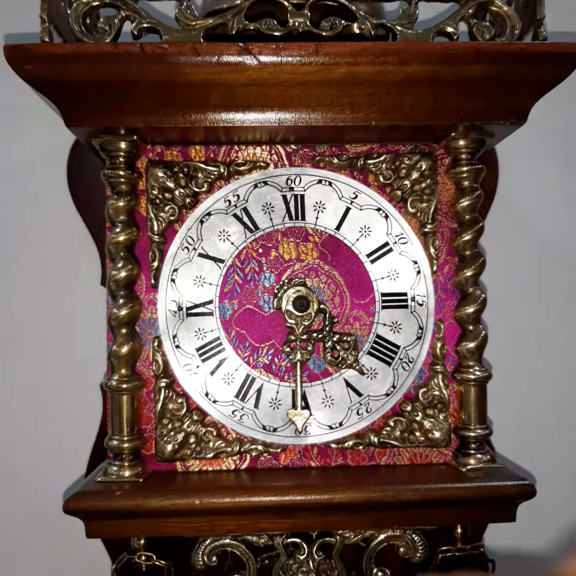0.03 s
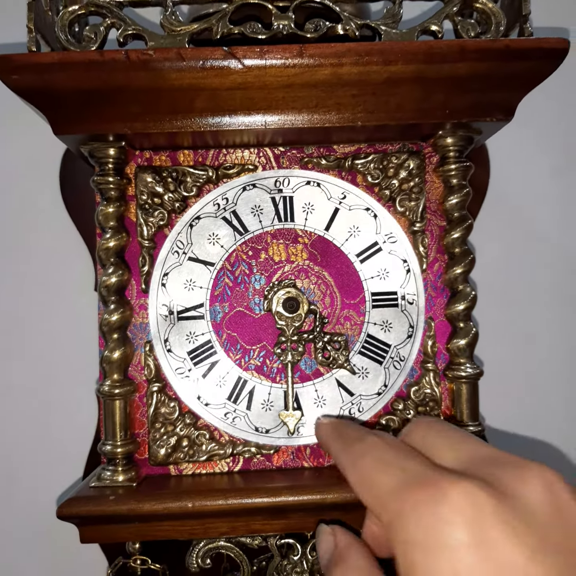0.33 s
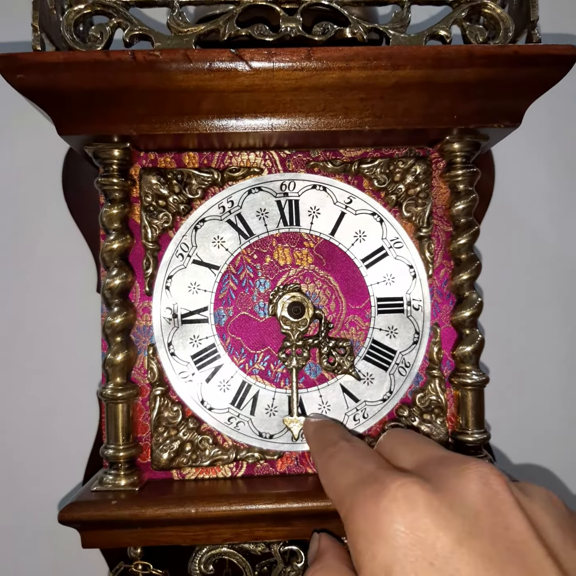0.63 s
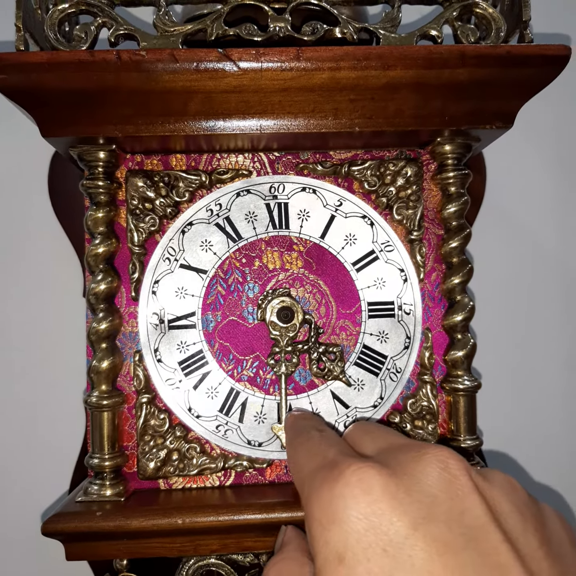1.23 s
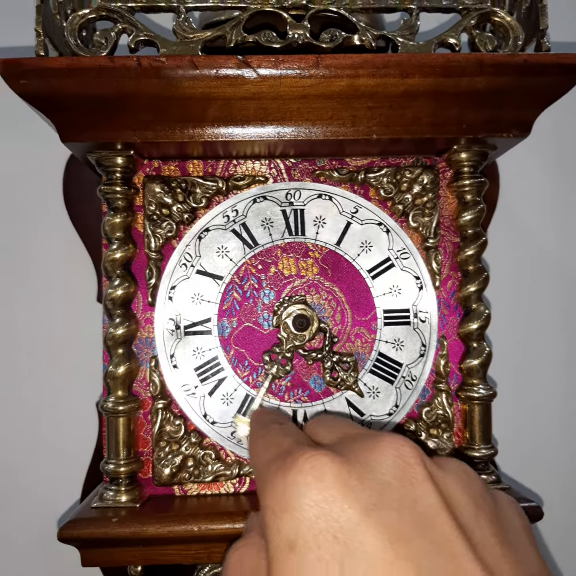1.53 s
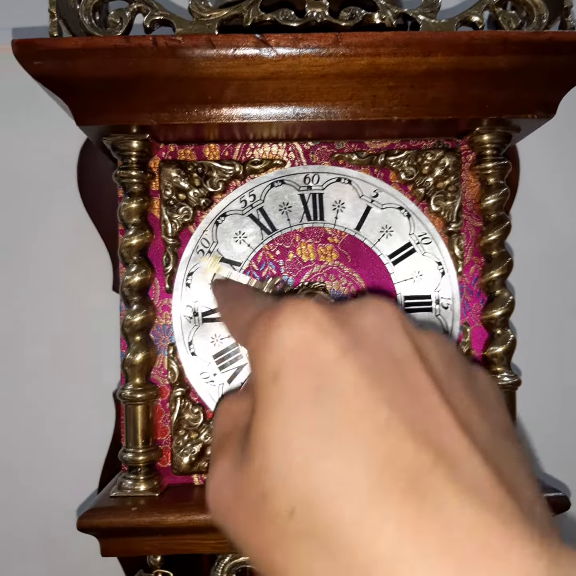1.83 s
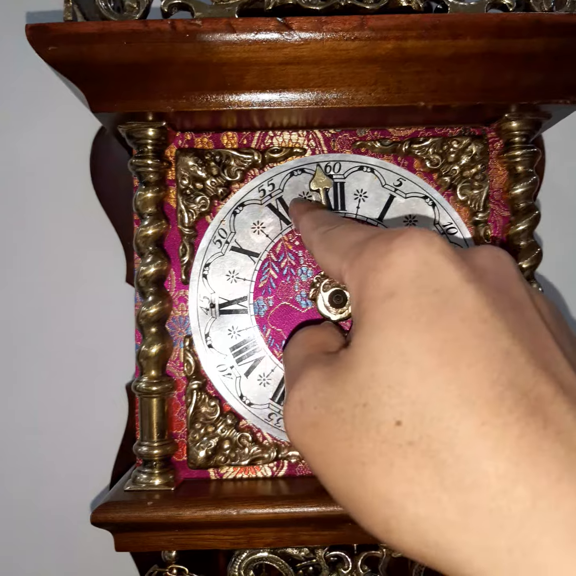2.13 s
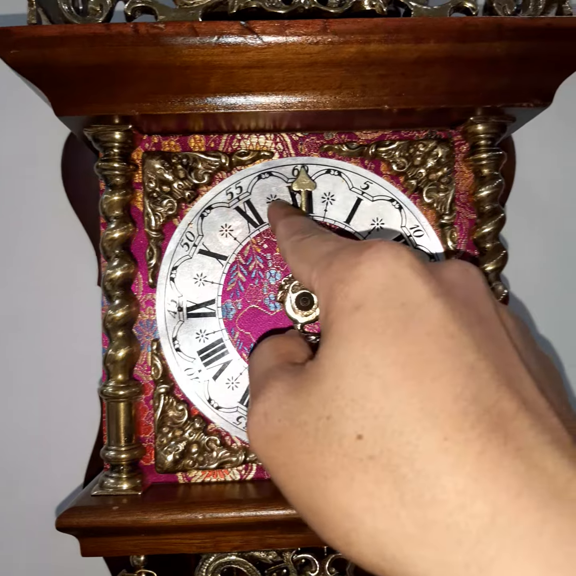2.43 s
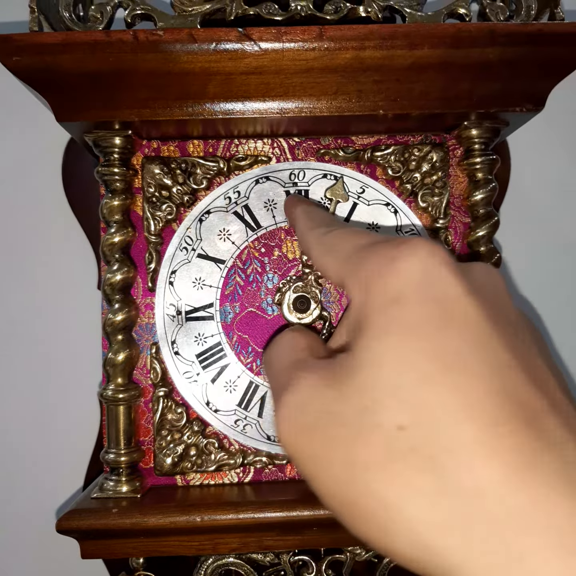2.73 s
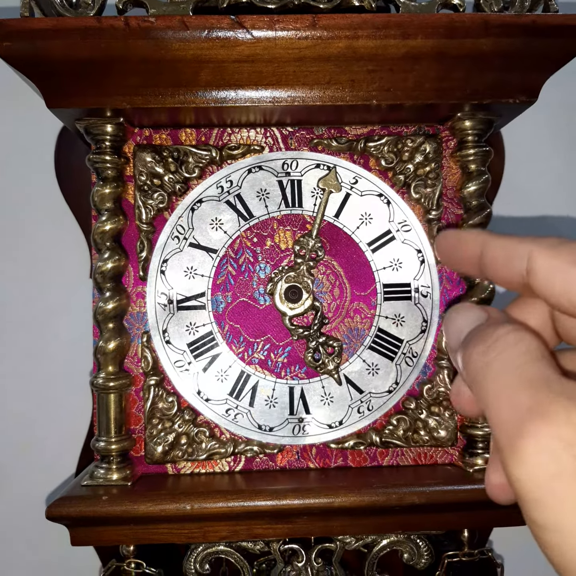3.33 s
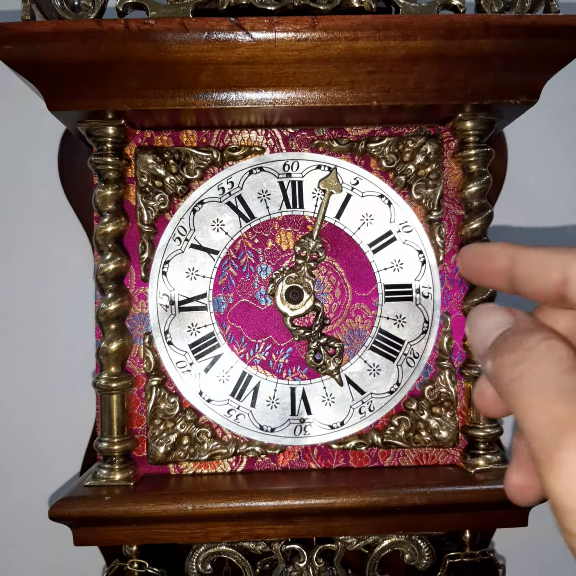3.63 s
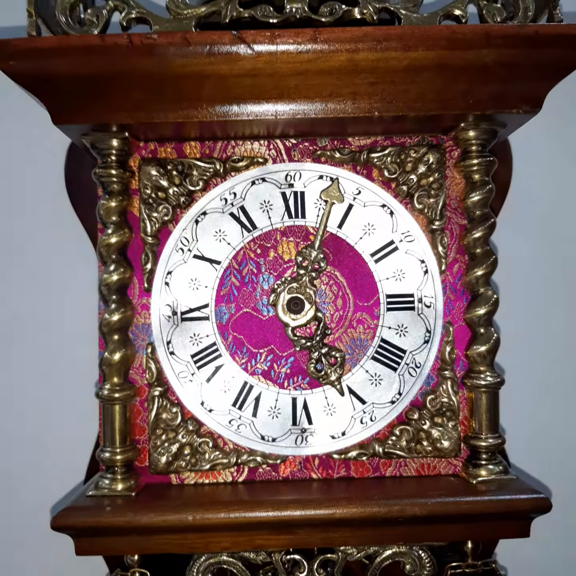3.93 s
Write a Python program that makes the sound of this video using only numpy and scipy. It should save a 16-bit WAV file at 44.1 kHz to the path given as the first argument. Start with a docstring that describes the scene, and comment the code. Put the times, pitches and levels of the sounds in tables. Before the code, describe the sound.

A wall clock's bell is already ringing from a strike. Levers knock and click in the wooden case as a finger turns the minute hand, then the bell strikes again and rings on, close up in a quiet room.

```python
"""A quiet room, a phone microphone close to a wall clock that is being set by hand.
At first the bell still rings from the half hour. A finger rubs the minute hand round the dial, the
strike levers knock in the wooden case, and the escapement ticks faintly in between. Near 3 s a low hum
swells and fades. At 3.4 s, on the hour, the hammer clashes on the bell again; it rings on over the
last few knocks."""
import sys
import numpy as np
from scipy import signal
from scipy.fft import rfft, irfft
from scipy.io import wavfile

SR = 44100
rng = np.random.default_rng(int(sys.argv[2]) if len(sys.argv) > 2 else 0)


def generate_wav(signal):
    """Clip the signal to [-1, 1] and save it as 16-bit WAV at the path in sys.argv[1]."""
    frames = np.transpose(np.atleast_2d(signal))
    scaled = np.clip(frames, -1, 1) * 32767
    pcm = np.round(scaled).astype(np.int16)
    wavfile.write(sys.argv[1], SR, pcm)


N = 176400
T = np.arange(N) / SR
FREQS = np.arange(N // 2 + 1) * SR / N
SIDE = np.array([[1], [-1]])  # opposite sign left and right: stereo width


def undb(db):
    """Decibels to gain."""
    return 10 ** (np.asarray(db) / 20)


def unit(x):
    """Scale to rms 1."""
    return x / np.sqrt(np.mean(x ** 2))


def pan(db):
    """Stereo gains that put the left side db above the right."""
    return undb(SIDE * db / 2)


def curve(points):
    """Gain over time from (time [s], level [dB]) points."""
    return undb(np.interp(T, *np.array(points).T))


def white():
    """Spectrum of fresh white noise."""
    return rfft(rng.standard_normal(N))


def walk(rate_hz):
    """Smooth random drift with spread 1."""
    return unit(irfft(white() * np.exp(-(FREQS / rate_hz) ** 2) * (FREQS > 0), N))


def tint(spectrum, colour):
    """Signal of rms 1 from a spectrum shaped by (frequency [Hz], level [dB]) points."""
    hz, db = np.array(colour).T
    return unit(irfft(spectrum * undb(np.interp(np.log(FREQS + 1), np.log(hz), db)), N))


def noise(colour):
    """Coloured noise of rms 1."""
    return tint(white(), colour)


def resonant(peaks):
    """Noise of rms 1 in steep resonances."""
    gain = sum(undb(db) / (1 + ((FREQS - hz) / width) ** 2) for hz, width, db in peaks)
    return unit(irfft(white() * gain, N))


def decay(start, t60, rise=0.00053):
    """Fast attack, then a fall of 60 dB in t60 seconds."""
    age = np.maximum(T - start, 0)
    return (1 - np.exp(-age / rise)) * np.exp(-np.log(1000) * age / t60)


def note(start, hz, db, t60):
    """One struck mode: a dying sine."""
    return undb(db) * decay(start, t60) * np.sin(2 * np.pi * hz * (T - start))


def blows(times, levels, t60):
    """Envelope of short blows, each with the room's tail 19 dB below it."""
    return sum(undb(db) * (decay(at, t60) + undb(-19) * decay(at, t60=0.45, rise=0.0037))
               for at, db in zip(times, levels))


# Room tone on each side of the microphone (frequency [Hz], relative level [dB])
ROOM_COLOUR_LEFT = [(25, -26), (60, -16), (100, 2.5), (150, -7.5), (230, -3.5), (400, -13), (800, -2),
                    (1300, -9.5), (2000, -13.5), (3200, -22.5), (5000, -33), (9000, -34.5), (16000, -41.5)]
ROOM_COLOUR_RIGHT = [(25, -32), (60, -8), (100, 1.5), (150, -8), (230, -12.5), (400, -18), (800, -17),
                     (1300, -22), (1900, -27), (2350, -20), (3100, -40), (3800, -60), (8000, -53.5),
                     (16000, -57)]

def room_tone():
    """Low noise of the room, its bass largely shared by both sides."""
    shared = white()
    share = 0.74 / (1 + (FREQS / 900) ** 2)
    sides = []
    for colour, db in ((ROOM_COLOUR_LEFT, -58), (ROOM_COLOUR_RIGHT, -50)):
        spectrum = np.sqrt(share) * shared + np.sqrt(1 - share) * white()
        sides.append(undb(db) * tint(spectrum, colour))
    return np.array(sides)


# Swell of the hum in the room (time [s], level [dB])
HUM_SWELL = [(0, -70), (2.7, -64.5), (2.85, -53), (3.05, -49), (3.25, -55), (3.45, -64), (4, -62)]

def hum():
    """A low, wavering tone near the centre."""
    phase = 2 * np.pi * 98.8 * T + 0.34 * walk(rate_hz=9.3)
    return np.sin(phase) * curve(HUM_SWELL) * pan(-2)


# Rise and fall of the hiss on the left (time [s], level [dB])
HISS_SWELL = [(0, -67), (.3, -69.5), (.85, -68), (1.1, -62), (1.8, -63.5), (2.3, -64), (2.5, -62),
              (2.75, -63.5), (3.15, -65.5), (3.38, -58.5), (4, -62.5)]
# Its colour on each side (frequency [Hz], relative level [dB])
HISS_COLOUR_LEFT = [(2000, -17.5), (3200, 3), (4800, 3), (6000, -4), (7400, -1), (8800, -11), (11000, -5.5),
                    (16000, -14.5)]
HISS_COLOUR_RIGHT = [(2000, 2.5), (4000, -3), (8000, -17.5), (10000, -5.5), (12500, 0.5), (16000, -6)]

def hiss():
    """Faint hiss, weaker on the right of the microphone."""
    return np.array([noise(HISS_COLOUR_LEFT), undb(-9) * noise(HISS_COLOUR_RIGHT)]) * curve(HISS_SWELL)


# Beats of the escapement (time [s], level [dB])
TICK_BEATS = [(0.618, -66.5), (1.023, -64), (1.504, -60), (1.907, -61), (2.416, -61.5), (2.824, -65),
              (3.327, -67)]
# Pallet resonances (frequency [Hz], half-width [Hz], relative level [dB])
PALLET_MODES = [(4850, 1400, -2.5), (7530, 170, 1.5), (9530, 200, 0.5), (10750, 130, -8.5),
                (12200, 150, -6), (14100, 1200, -15)]

def escapement():
    """Thin, slightly limping ticks of the pallets, well left of the microphone."""
    times, levels = np.array(TICK_BEATS).T
    return resonant(PALLET_MODES) * blows(times, levels, t60=0.058) * pan(23)


# Course of the finger's push (time [s], level [dB])
RUB_SWELL = [(0, -53), (.25, -55), (.75, -63.5), (1.1, -56.5), (1.8, -51), (2.3, -56), (2.55, -50),
             (2.75, -64), (3.1, -59.5), (3.35, -51), (3.8, -56), (4, -48)]
# Colour of the friction (frequency [Hz], relative level [dB])
RUB_COLOUR = [(100, -15), (250, 2), (400, -1.5), (750, 1), (1100, -7), (1800, -11.5), (2400, -14),
              (3200, -15), (4000, -44.5), (16000, -50)]

def rubbing():
    """Uneven friction of finger and minute hand going round the dial, near the centre."""
    friction = noise(RUB_COLOUR) + 0.64 * noise(RUB_COLOUR) * SIDE
    grain = undb(1.5 * walk(rate_hz=40))
    return friction * curve(RUB_SWELL) * grain * pan(-2)


# Resonances of the wooden case (frequency [Hz], half-width [Hz], relative level [dB])
CASE_MODES = [(120, 50, -1), (233, 26, -4.5), (297, 30, -2), (395, 17, -2.5), (573, 69, -3.5)]

def case_thuds(times, levels):
    """Each knock thuds in the wood and leaves a low ring, right of the microphone."""
    wood = resonant(CASE_MODES) + 0.5 * resonant(CASE_MODES) * SIDE
    ring = sum(note(at, hz=300, db=db - 13, t60=0.2) for at, db in zip(times, levels))
    return (wood * blows(times, levels, t60=0.028) + ring) * pan(-9.5)


# Resonances of the dial (frequency [Hz], half-width [Hz], relative level [dB])
DIAL_MODES = [(575, 82, 1), (774, 58, -12), (837, 18, 8), (1033, 27, 7.5), (1393, 330, -8),
              (1900, 880, -15)]

def dial_clacks(times, levels, pitches):
    """Each knock clacks in the dial: a noisy burst, a ping of its own pitch and a slower ring."""
    rattle = resonant(DIAL_MODES) + resonant(DIAL_MODES) * SIDE
    burst = undb(-2.5) * rattle * blows(times, levels, t60=0.028)
    ping = sum(note(at, hz, db - 1.5, t60=0.04) for at, db, hz in zip(times, levels, pitches))
    ring = sum(note(at, hz=740, db=db - 14.5, t60=0.22) for at, db in zip(times, levels))
    return (burst + ping + ring) * pan(1)


# Colour of a click in the brass (frequency [Hz], relative level [dB])
BRASS_COLOUR = [(1500, -21.5), (3000, 4.5), (4200, -2.5), (5200, 3), (6500, -5), (9000, -13), (12500, -6.5),
                (15000, -11.5), (16500, -14)]

def brass_clicks(times, levels):
    """Each knock clicks brightly in the brass, left of the microphone."""
    brass = np.array([noise(BRASS_COLOUR), noise(BRASS_COLOUR)])
    return brass * blows(times, levels, t60=0.042) * pan(18.5)


# Knocks of levers and hand (time [s], thud level [dB], clack level [dB], click level [dB], pitch [Hz])
LEVER_KNOCKS = [(.048, -50, -29.5, -50, 735), (.062, -38, -26.5, -42.5, 820), (0.076, -34.5, -46, -80, 556),
                (.665, -41.5, -47, -84, 150), (1.098, -62, -45, -72, 850), (1.275, -41.5, -46, -76, 483),
                (1.44, -38.5, -45, -80, 440), (1.753, -36, -56, -74, 500), (1.978, -44, -31, -55, 1360),
                (2.006, -46, -38, -61, 1260), (2.080, -42.5, -28.5, -47.5, 1250),
                (2.101, -47, -35, -75, 555), (2.175, -42, -33.5, -76, 837), (2.228, -44.5, -37, -80, 545),
                (2.270, -40.5, -37, -89, 1026), (2.299, -47, -39, -83, 626), (2.325, -46, -41.5, -76, 810),
                (2.356, -50, -46, -78, 1030), (2.441, -52, -32.5, -58, 1034), (2.461, -50, -37, -47, 818),
                (2.493, -56, -41, -60, 818), (3.412, -39.5, -49, -77, 458), (3.45, -47, -41, -76, 790),
                (3.916, -40.5, -42, -73, 600), (3.990, -46, -34, -61, 1030)]

def levers():
    """The strike levers at close range: every knock shakes dial, case and brass together."""
    times, thud_db, clack_db, click_db, pitches = np.array(LEVER_KNOCKS).T
    return (dial_clacks(times, clack_db, pitches) + case_thuds(times, thud_db)
            + brass_clicks(times, click_db))


HALF_HOUR_S, HOUR_S = -0.26, 3.423  # the two hammer blows; the first falls just before the start
# Clash of hammer on bell (frequency [Hz], relative level [dB])
CLASH_COLOUR = [(700, -38), (1100, -30), (2000, -40), (3800, -40), (5000, -32), (7000, -29), (7800, -20),
                (9000, -26), (10400, -17), (10980, 0), (11400, -10), (11850, 1), (12400, -16), (14000, -19),
                (14700, -22), (15500, -14), (16200, -36)]
# Shimmer after the clash (frequency [Hz], half-width [Hz], relative level [dB])
SHIMMER_MODES = [(6650, 200, -20), (7800, 130, -17), (8900, 100, -20), (9720, 80, -11), (10085, 60, -13),
                 (10970, 100, 0), (11700, 90, -3), (11900, 110, 0), (13170, 55, -4), (13990, 60, -2),
                 (15520, 80, -4)]

def hammer():
    """Metal meets metal on the hour, close on the left: a hard clash and a short bright shimmer."""
    clash = np.array([noise(CLASH_COLOUR), noise(CLASH_COLOUR)]) * decay(HOUR_S, t60=0.034, rise=0.0043)
    shimmer = np.array([resonant(SHIMMER_MODES), resonant(SHIMMER_MODES)]) * decay(HOUR_S, t60=0.54)
    return undb(-11.5) * pan(26.5) * clash + undb(-33.5) * pan(15.5) * shimmer


# Partials of the bell (frequency [Hz], half-hour level [dB], hour level [dB], t60 [s],
# left over right [dB], left phase lead [rad])
BELL_PARTIALS = [(615.7, -47, -48, 60, -1.5, 1.3), (626.8, -52.5, -57, 60, -3.3, 1.8),
                 (1627.8, -38.5, -40, 22, 2, -2.7), (1654.1, -48, -47, 17, 3, -1.9),
                 (2948.7, -41, -33.5, 12, 16, .9), (3000.4, -43.5, -35, 12, 2, .1),
                 (4591.6, -31.5, -30, 4.9, 17, -2.4), (6374.6, -33.5, -27, 1.55, 28, 1.6),
                 (6386.5, -48, -46, 1.8, 24, 0), (7540, -68, -61, 2.8, 26, 0), (7562, -74, -68, 2.2, 26, 0),
                 (8420.4, -52, -34.5, .7, 28, 0), (8428, -60, -46, .7, 24, 0), (9323, -70, -60, .7, 24, 0),
                 (10696.5, -50, -29.5, .44, 19, 0), (10986, -56, -43.5, .5, 17, 0),
                 (11013, -58, -46, 1.0, 19, 0), (12383, -56, -39, .38, 21, 0),
                 (12450, -60, -44, .38, 24, 0), (12947, -60, -43, .44, 21, 0),
                 (12990, -60, -44, .36, 22, 0), (13147, -56, -40, .45, 17, 0),
                 (13176, -56, -39.5, .5, 17, 0), (15499, -50, -30, .3, 25, 0), (2046, -75, -54, .55, 16, 0)]
# Slow rise and fall of the whole ring (time [s], gain [dB])
RING_SWELL = [(0, 0), (.4, 0), (.8, -0.5), (1.3, 1.9), (1.9, 3), (2.6, 2.5), (3.3, -0.5), (3.45, 0.2),
              (4, .5)]
DIRECT_SHARE, BUILD_S = 0.39, 0.032  # the direct sound comes first, then reflections fill in the ring
WAVER_DB, WAVER_HZ = 0.88, 2.85  # each partial wavers as the phone moves

def bell():
    """The bell from close by: each blow adds energy, close pairs beat and the high partials die first."""
    ring = 0
    for hz, half_hour_db, hour_db, t60, pan_db, lead in BELL_PARTIALS:
        energy = 0
        for at, db in ((HALF_HOUR_S, half_hour_db), (HOUR_S, hour_db)):
            direct = DIRECT_SHARE * decay(at, t60)
            reflected = (1 - DIRECT_SHARE) * decay(at, t60, rise=BUILD_S)
            energy += (undb(db) * (direct + reflected)) ** 2
        waver = undb(WAVER_DB * np.array([walk(WAVER_HZ), walk(WAVER_HZ)]))
        phase = 2 * np.pi * rng.random() + np.array([[lead], [0]])
        ring += np.sqrt(energy) * waver * pan(pan_db) * np.sin(2 * np.pi * hz * T + phase)
    return ring * curve(RING_SWELL)


def scene():
    """The clock close to the microphone, the quiet room behind it."""
    clock = bell() + hammer() + levers() + escapement() + rubbing()
    return clock + room_tone() + hum() + hiss()


def record(dry):
    """The phone's microphone cuts the bass below 36 Hz and the top above 15.9 kHz."""
    low_cut = signal.butter(3, 36, "high", fs=SR, output="sos")
    high_cut = signal.ellip(8, .2, 70, 15900, fs=SR, output="sos")
    return signal.sosfilt(high_cut, signal.sosfilt(low_cut, dry))


dry = scene()
out = record(dry)
generate_wav(out)
```